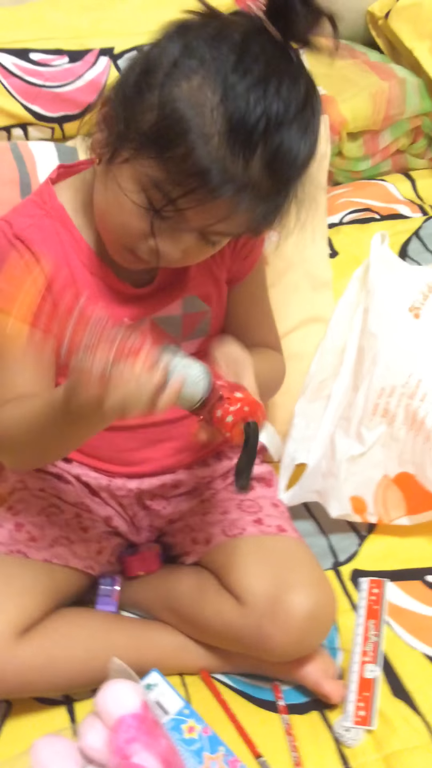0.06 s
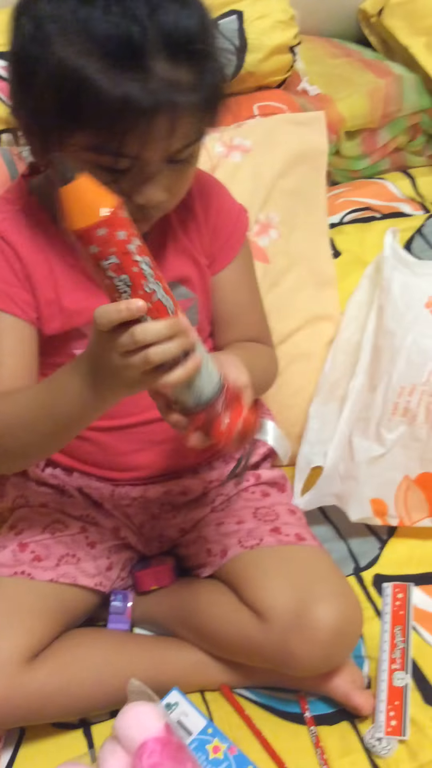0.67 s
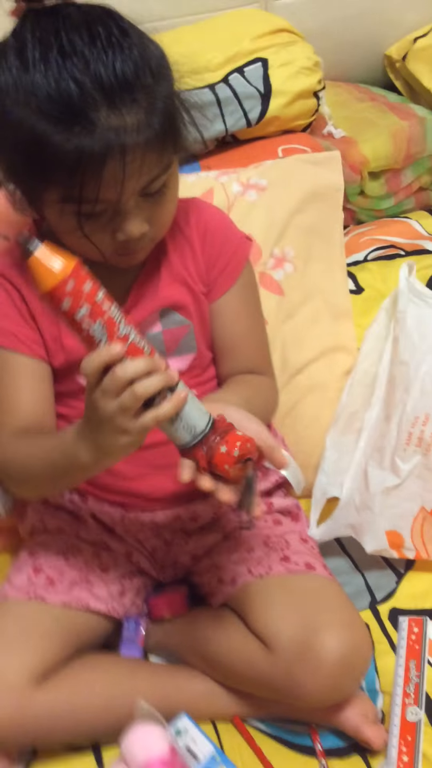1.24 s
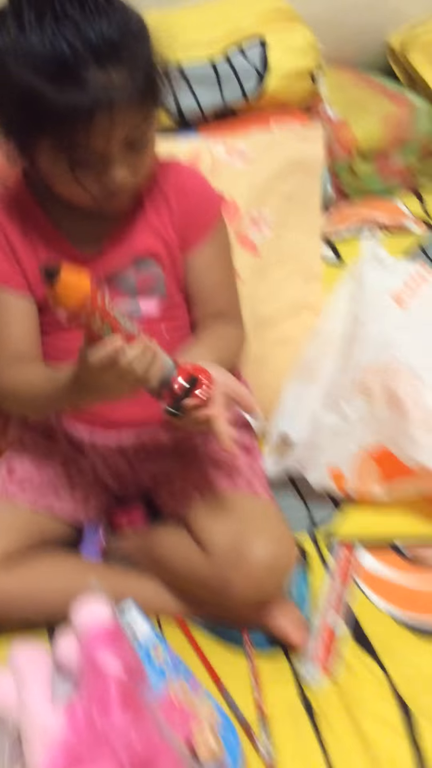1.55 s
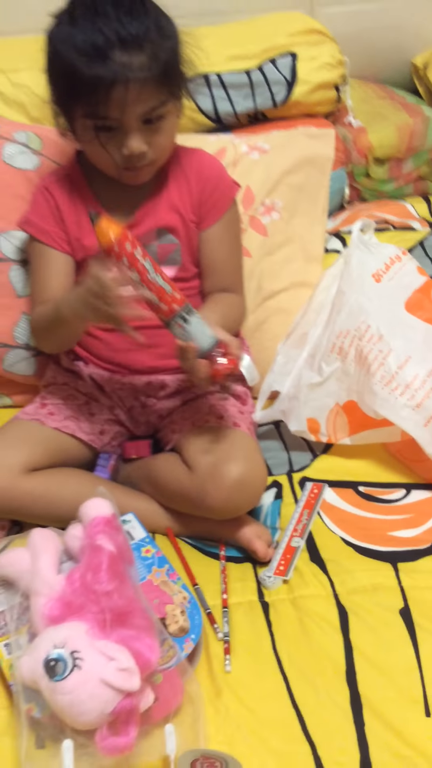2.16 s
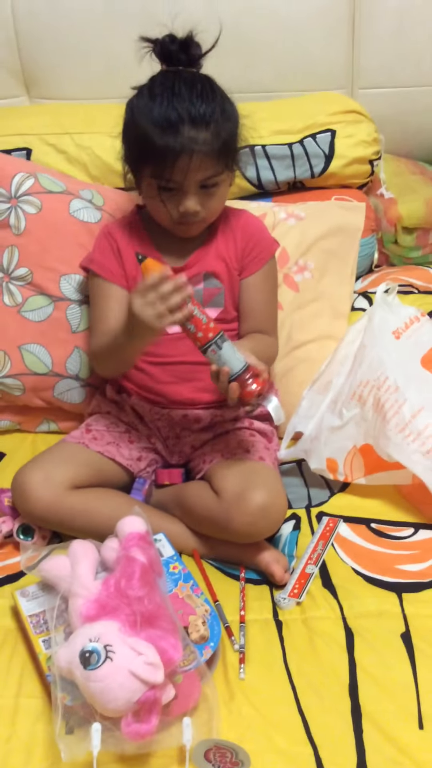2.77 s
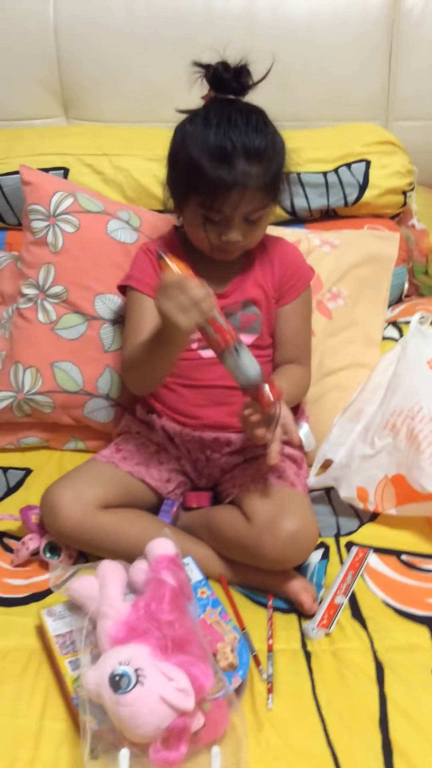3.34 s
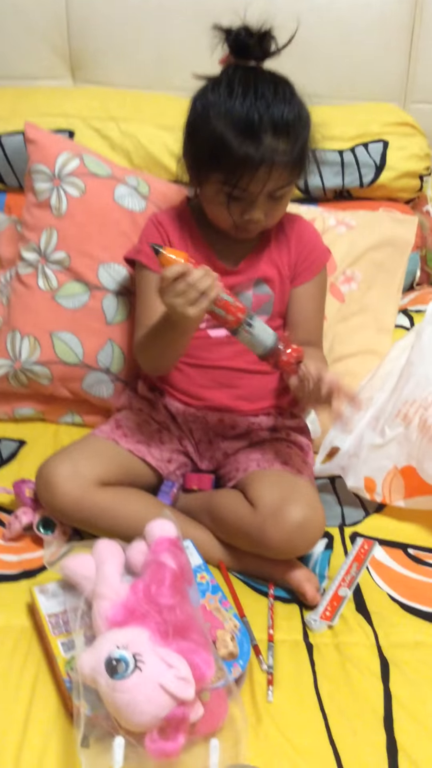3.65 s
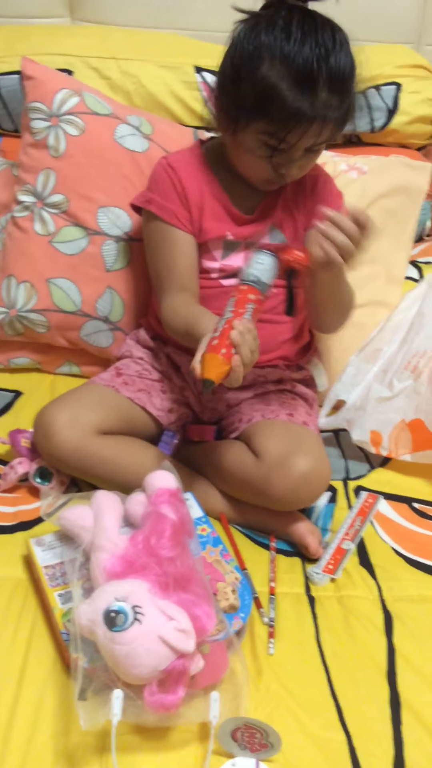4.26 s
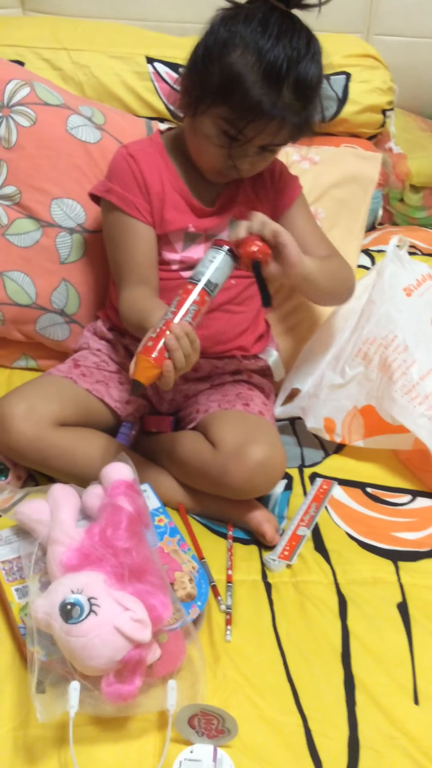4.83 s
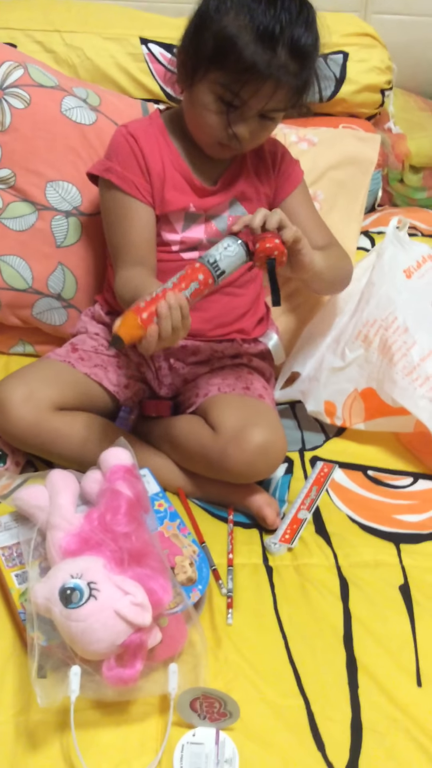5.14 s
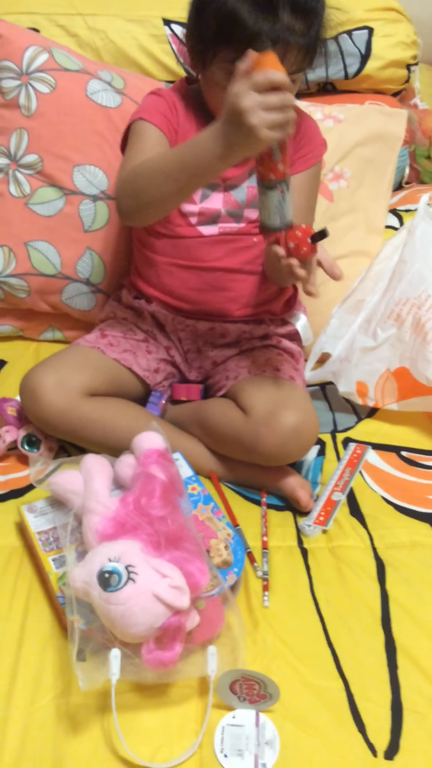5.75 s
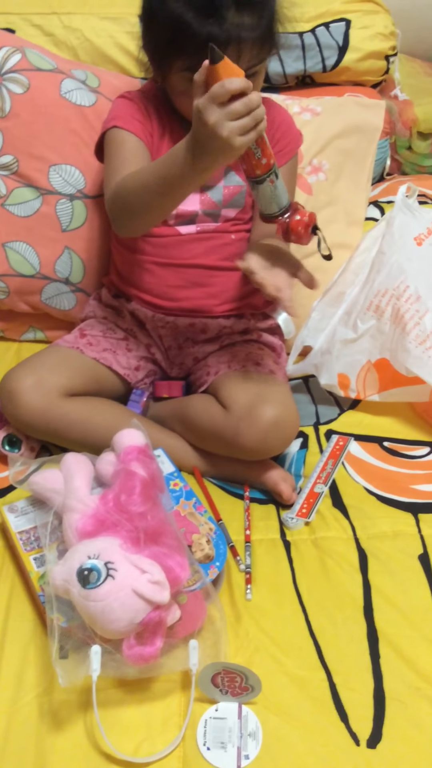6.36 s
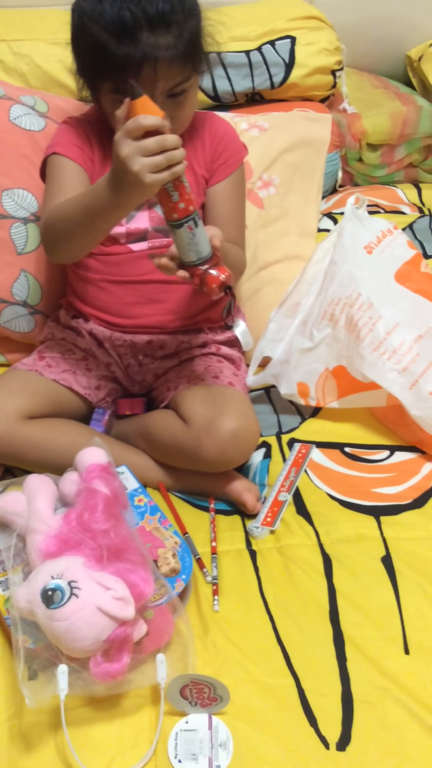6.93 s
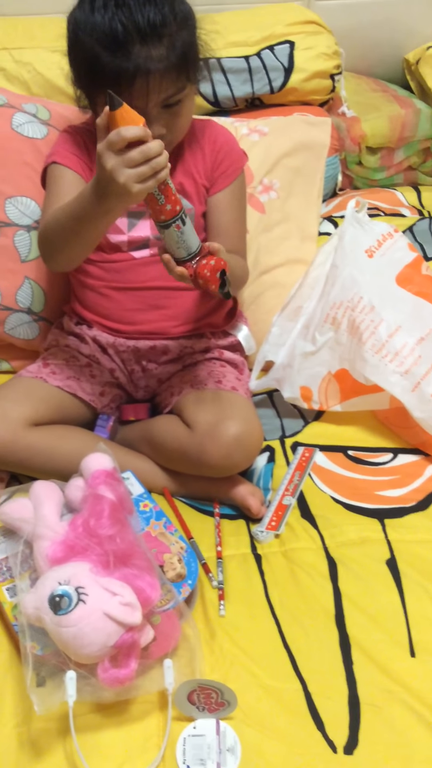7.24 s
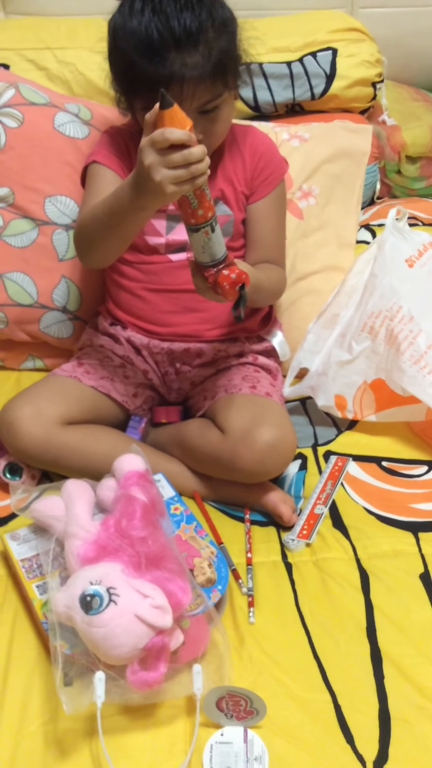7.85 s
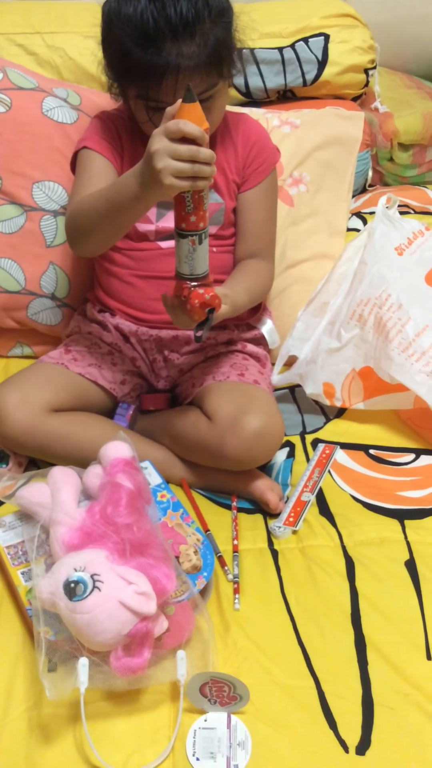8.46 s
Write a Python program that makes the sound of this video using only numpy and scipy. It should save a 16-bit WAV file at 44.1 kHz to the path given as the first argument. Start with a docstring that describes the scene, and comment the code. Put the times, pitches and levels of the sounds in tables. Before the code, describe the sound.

A hard plastic pencil case is handled close by in a small bedroom with a faint, steady hum. A loud, sharp snap comes right at the start. Light clicks and short, faint scrapes follow as the tube's sections twist, with a sharper click near 0.8 seconds. At about 2.4 seconds the cap comes off with a hollow pop, and another click follows at 2.9. From 3 to 4 seconds the plastic rubs more strongly, with clicks, small hollow knocks and a soft rustle of clothes. A bright click sounds near 4.8 seconds, then only faint ticks and rubbing. At about 7.1 seconds there is a quick cluster of sharp snaps. From 7.2 to 8.2 seconds the hand-held microphone takes soft, low bumps and rumbles, with a few last faint ticks until about 8.6 seconds.

```python
"""Handling a plastic pencil case

A hard hollow tube with a cap is turned over in the hands in a small bedroom. Loose parts click and
snap, ringing the shell; the sections rub by stick-slip as they twist; the cap comes off with a hollow
pop of the air inside. Cloth rustles, the room hums, the hand-held microphone takes soft bumps."""
import sys
import numpy as np
from scipy import signal
from scipy.fft import rfft, irfft, next_fast_len
from scipy.io import wavfile
from scipy.ndimage import map_coordinates

SR = 44100
rng = np.random.default_rng(int(sys.argv[2]) if len(sys.argv) > 2 else 0)


def persist_wave(psi):
    """Save psi, clipped to +-1, as 16-bit WAV."""
    counts = np.round(np.clip(psi, -1, 1) * 32767).astype(np.int16)
    wavfile.write(sys.argv[1], SR, np.atleast_2d(counts).T)


N = 379260

# Twists of the sections. Each row: start and end in seconds, relative level in dB, then offsets in dB
# for tube ring, squeak and hollow air.
STROKES = [(0.317, .62, -66.5, -13, 1.5, -6), (0.629, 0.817, -73.5, -8, 3, 6),
           (0.851, 1.02, -67.5, -13, -10, 9), (1.037, 1.214, -66.5, -26, 3, -18),
           (1.471, 1.628, -63.5, -16, -11, -15), (1.651, 1.801, -67.5, -13, -20, -3),
           (1.803, 2.25, -72.5, -4, -20, -10.5), (2.549, 2.716, -64, -9, -16, -5),
           (3.06, 3.443, -58.5, -5, -9.5, -2.5), (3.237, 3.313, -46, -8.5, -30, -15),
           (3.429, 3.64, -55.5, -17, -8, -11.5), (3.504, 3.549, -49, 3, -20, -10.5),
           (3.726, 3.94, -59, -15, -2.5, -18), (4.89, 5.159, -68, -5.5, -7, -3),
           (5.271, 5.329, -65, -5, -5, -9), (5.451, 5.553, -65, -4.5, -15, -1),
           (5.602, 5.707, -63.5, -12, -3, -6), (5.75, 5.916, -64, -7.5, -10, 1),
           (6.56, 6.875, -74, -12.5, -3.5, -5), (6.972, 7.098, -70.5, -12, -20, -2),
           (7.842, 7.924, -71, 1, -19.5, -6), (8.27, 8.508, -72.5, -0.5, -11, -11)]


def amp(db):
    """Decibels to gain."""
    return 10 ** (np.asarray(db) / 20)


def unit(x):
    """Scale to rms 1."""
    return x / np.sqrt(np.mean(x ** 2) + 1e-20)


def along(points, hz):
    """Interpolate (Hz, value) points on a log axis."""
    point_hz, values = np.transpose(points)
    return np.interp(np.log(hz + 1), np.log(point_hz + 1), values)


def add(track, start_s, x):
    """Mix x into the track."""
    i = max(round(start_s * SR), 0)
    track[i:i + len(x)] += x[:max(len(track) - i, 0)]


def filtered(x, response):
    """Apply a response given as a function of Hz."""
    size = next_fast_len(len(x) + SR // 8)
    return irfft(rfft(x, size) * response(np.fft.rfftfreq(size, 1 / SR)), size)[:len(x)]


def coloured(x, spectrum):
    """Shape x by (Hz, dB) points; rms 1."""
    return unit(filtered(x, lambda hz: amp(along(spectrum, hz))))


def resonances(modes, hz):
    """Causal response of (centre Hz, width Hz, dB) modes of alternating sign."""
    return sum((-1) ** k * amp(db) * 1j * hz * width / (centre ** 2 - hz ** 2 + 1j * hz * width)
               for k, (centre, width, db) in enumerate(modes))


def rung(force, modes):
    """Modes driven by a force; rms 1."""
    return unit(filtered(force, lambda hz: resonances(modes, hz)))


def minimum_phase(gain):
    """Most compact impulse response with this gain per frequency."""
    cepstrum = irfft(np.log(np.maximum(gain, 1e-6)))
    half = len(cepstrum) // 2
    cepstrum[1:half] *= 2
    cepstrum[half + 1:] = 0
    return irfft(np.exp(rfft(cepstrum)))


def wobble(knots_per_s):
    """Smooth random curve."""
    knots = rng.standard_normal(int(N * knots_per_s / SR) + 4)
    return map_coordinates(knots, [np.arange(N) * knots_per_s / SR])


def slips(size, per_s, spread_db, hiss):
    """Stick-slip friction: tiny uneven jerks on a smooth hiss."""
    slipping = rng.random(size) < per_s / SR
    strength = amp(spread_db * np.minimum(rng.exponential(size=size), 3))
    jerks = slipping * strength * rng.choice([-1, 1], size)
    return unit(unit(jerks) + hiss * rng.standard_normal(size))


def room(x, tail_db, build_s=0.0049):
    """Reflections of x: a few near surfaces and a diffuse tail."""
    # Room decay. Each row: frequency in Hz, T60 in seconds.
    decay = [(300, 0.14), (1200, 0.21), (4000, .24), (9000, 0.27), (15000, 0.055)]
    # Near surfaces. Each row: delay in seconds, gain in dB.
    echoes = [(.0066, -16.5), (.0075, -14), (0.012, -13.5), (0.0151, -18.5), (.025, -18.5), (0.0411, -24.5)]
    hz, t, noise = signal.stft(rng.standard_normal(SR // 2), SR, nperseg=256)
    tail = signal.istft(noise * amp(-60 * t / along(decay, hz)[:, None]), SR, nperseg=256)[1]
    tail *= 1 - np.exp(-(np.arange(len(tail)) / SR / build_s) ** 2)
    tail *= amp(tail_db) / np.linalg.norm(tail)
    for delay_s, db in echoes:
        stretch = 1 + .04 * rng.uniform(-1, 1)  # paths change as the case moves
        tail[round(delay_s * SR * stretch)] += amp(db)
    return signal.fftconvolve(x, tail)


def room_hum():
    """Steady room noise with a ventilation drone."""
    # Room noise spectrum. Each row: frequency in Hz, relative density in dB.
    spectrum = [(20, -28.5), (50, -7), (100, -3), (175, -2), (256, -2.5), (363, -7), (620, -12.5),
                (1020, -16), (1400, -20.5), (2760, -27), (3720, -27), (5500, -33.5), (9070, -28),
                (15000, -40.5)]
    air = coloured(rng.standard_normal(N), spectrum)
    vent_modes = [(80, 30, -10), (158.3, 23, 3), (356, 60, -8)]
    drone = unit(filtered(rng.standard_normal(N), lambda hz: resonances(vent_modes, hz) ** 2))
    return amp(-65) * air + amp(-71.5) * drone


def cloth():
    """Clothes shift on the bedding: dense, soft friction."""
    # Cloth rustle swelling and fading throughout. Each row: time in seconds, relative level in dB.
    rustle_level = [
        [(0.2, -69), (1.06, -66.5), (1.21, -70.5), (2.9, -73.5), (3.39, -60.5), (3.73, -65.5), (3.92, -71),
         (4.05, -74)],
        [(5.2, -84), (5.36, -81), (5.75, -70.5), (5.96, -84), (6.28, -83.5), (7.24, -78), (8.18, -88),
         (8.6, -79.5)],
    ]
    # Rustle spectrum. Each row: frequency in Hz, relative density in dB.
    spectrum = [(200, -22), (600, 1.5), (1500, 3.5), (3500, 2), (6500, -3.5), (9000, -1.5), (12500, -10.5),
                (15500, -22)]
    level_db = 1.5 + np.interp(np.arange(N) / SR, *np.vstack(rustle_level).T) + wobble(8.3)
    return amp(level_db) * coloured(slips(N, per_s=4000, spread_db=2, hiss=2.1), spectrum)


def grip_rumble(gain_db=-2.5, swing=1.5):
    """The carrying hand rumbles in the microphone as it moves."""
    # Hand motion. Each row: time in seconds, relative level in dB.
    motion = [(0.0, -72), (1.87, -64.5), (2.27, -73), (5.51, -76), (5.8, -69), (5.99, -72), (6.99, -69),
              (7.35, -63.5), (8.14, -62), (8.26, -68), (8.6, -68.5)]
    spectrum = [(15, -21), (35, -6), (60, 2), (110, -2.5), (180, -10), (320, -23), (900, -54.5)]
    motion_db = np.interp(np.arange(N) / SR, *np.transpose(motion))
    mean_db = motion_db.mean()
    level_db = gain_db + mean_db + swing * (motion_db - mean_db) + 2 * wobble(12)
    return amp(level_db) * coloured(rng.standard_normal(N), spectrum)


def bumps(gain_db=-1, rise_s=0.0082, body_hz=81.3, detune=0.09):
    """A shifting grip pushes the microphone's body through a cycle or two."""
    # Soft bumps. Each row: start in seconds, relative peak in dB.
    pushes = [(.681, -50.5), (3.825, -47), (3.87, -46.5), (3.904, -45.5), (4.281, -53.5), (5.805, -52.5),
              (6.975, -50.5), (7.251, -36), (7.369, -47.5), (7.495, -39), (7.527, -40.5), (7.678, -41.5),
              (7.8, -47), (8.05, -43), (8.11, -33), (8.14, -43), (8.193, -41.5)]
    shudder_spectrum = [(20, -19), (45, 11.5), (110, -2), (200, -0.5), (400, -55), (1200, -75)]
    out, t = np.zeros(N), np.arange(SR // 6) / SR
    push = (t / rise_s) ** 2 * np.exp(2 - 2 * t / rise_s)
    for start_s, db in pushes:
        hz = body_hz * (1 + detune * rng.normal())
        thump = push * np.sin(2 * np.pi * hz * t)
        shudder = np.sqrt(push) * coloured(rng.standard_normal(len(t)), shudder_spectrum)
        add(out, start_s, amp(db + gain_db) * (thump + amp(-9) * shudder))
    return out


def pops(t60_cycles=24, attack_s=0.0015):
    """The tube's air rings as a part snaps, a hand knocks or the cap leaves or seats."""
    # Air pops. Each row: start in seconds, level in dB, pitch in Hz.
    strikes = [(.0226, -38.5, 710), (.324, -49.5, 333), (.683, -47.5, 291), (2.4301, -28.5, 359),
               (3.256, -42.5, 390), (3.284, -43.5, 380)]
    puff_spectrum = [(80, -20), (300, -8), (900, -2.5), (2000, -16.5), (6000, -18.5)]
    out, t = np.zeros(N), np.arange(SR // 4) / SR
    for start_s, db, hz in strikes:
        fade = amp(db - 60 * t * hz / t60_cycles)
        note = fade * (1 - np.exp(-t / attack_s)) * np.sin(2 * np.pi * hz * t)
        puff = amp(-16.5) * fade * coloured(rng.standard_normal(len(t)), puff_spectrum)
        add(out, start_s, note + puff)
        add(out, start_s, amp(-5) * room(note + puff, tail_db=-1))
        add(out, start_s + 0.024, amp(-8) * note)  # two walls send the note back
        add(out, start_s + 0.069, amp(-13.5) * note)
    return out


def rubbing(catch_db=3):
    """Twisting sections: friction wakes the wall, the tube's length, its air and a thin squeak."""
    # Wall resonances. Each row: centre in Hz, width in Hz, gain in dB.
    wall_modes = [(1480, 130, -6.5), (1860, 150, 6.5), (2405, 800, -1), (3150, 290, 7), (3550, 390, 3.5),
                  (4220, 260, 3.5)]
    # Spectra of the broad scrape and the treble fizz. Each row: frequency in Hz, relative density in dB.
    scrape_spectrum = [(150, -22), (400, -9), (800, -1), (1500, -5), (3500, -11.5), (5500, -24),
                       (8000, -15.5), (16000, -38)]
    fizz_spectrum = [(2500, -28.5), (4500, -4.5), (5600, 1), (6800, -7.5), (8200, 0.5), (9800, -3),
                     (12500, -25), (14200, -10.5), (15500, -25)]
    tube_modes = [(1125, 62, -1.8), (1250, 63, -0.23)]
    air_modes = [(160, 43, -7), (295, 55, 0.5), (389, 69, 0)]
    squeak_modes = [(11020, 160, 1.5), (14500, 260, -15.5)]
    out = np.zeros(N)
    catching = amp(catch_db * wobble(90))  # surfaces catch and let go within a stroke
    for start_s, end_s, db, tube_db, squeak_db, air_db in STROKES:
        size = max(round((end_s - start_s) * SR), 512)
        creak = slips(size, per_s=170, spread_db=4, hiss=0.22)
        slide = slips(size, per_s=1800, spread_db=3.5, hiss=0.84)
        fizz = slips(size, per_s=1200, spread_db=0.5, hiss=0.39)
        sound = (amp(-3) * rung(creak, wall_modes)
                 + amp(-7) * coloured(slide + creak, scrape_spectrum)
                 + amp(tube_db - 2) * rung(slide, tube_modes)
                 + amp(air_db - 1) * rung(slide, air_modes)
                 + amp(-6) * coloured(fizz, fizz_spectrum)
                 + amp(squeak_db - 1) * rung(slide + creak, squeak_modes))
        pressure = np.sin(np.pi * np.arange(size) / size) ** 0.8
        add(out, start_s, amp(db) * pressure * sound)
    out *= catching
    return amp(-0.5) * out + amp(-5.5) * room(out, tail_db=-1.5)[:N]


def ticks(per_s=14, spread_db=3.5, low_hz=1910, high_hz=4000, middle_db=4, treble_db=-6):
    """Contact rows for clicks(): rubbing surfaces catch faintly, strongest at mid-stroke."""
    rows = []
    for start_s, end_s, stroke_db, *_ in STROKES:
        count = max(round(per_s * (end_s - start_s)), 1)
        for k, (jitter, force, part) in enumerate(rng.random((24, 3))[:count]):
            progress = (k + jitter) / count
            pressure_db = 10 * np.log10(np.sin(np.pi * progress))
            db = min(stroke_db + 4, -59) + pressure_db + spread_db * (2 * force - 1)
            ring_hz = low_hz * (high_hz / low_hz) ** part
            rows.append((start_s + (end_s - start_s) * progress, db, ring_hz, middle_db, treble_db))
    return rows


def contact_gain(hz, force_db, middle_db, treble_db):
    """Spectrum of a blow: a light touch thuds, a hard snap is thinner."""
    low_db = -6.5 - 0.24 * force_db
    spectrum = [(80, low_db - 17), (350, low_db), (700, low_db),
                (1100, (low_db + middle_db) / 2 - 1.5), (1900, middle_db), (3700, -0.37),
                (5400, treble_db / 2), (8500, treble_db + 1.5),
                (11500, treble_db - 1), (15500, treble_db - 9)]
    return amp(along(spectrum, hz))


def blow(t, force_db):
    """An impulse, then chatter that gets shorter and weaker the harder the contact."""
    chatter_s = 0.00325 * 0.5 ** (force_db / 90)
    chatter = rng.standard_normal(len(t)) * np.exp(-(t / chatter_s) ** 2)
    force = chatter / np.linalg.norm(chatter) * chatter_s / 0.0025  # equals the impulse at 2.5 ms
    force[0] += 1
    return force


def clicks(gain_db=23, touch_db=-50, detune=0.016, vary_db=2, ring_width_ratio=0.16):
    """Each blow rings the shell and, most of all, the struck part; hard snaps ring more evenly."""
    # Clicks and snaps. Each row: start in seconds, relative level in dB, struck part's ring in Hz,
    # middle and treble in dB against the 4 kHz band.
    contacts = [(0.0227, -17.5, 5450, -11, -2.5), (0.0246, -33, 4465, -13.5, -7),
                (0.3236, -54, 1560, 3, -7), (0.373, -54.5, 1310, 20, 12), (0.3995, -42, 1480, 9.5, -10),
                (0.4939, -48, 3760, 7, -9), (.5159, -57, 2450, 12, 0), (.5371, -51, 2280, 11, 1),
                (.558, -49, 2320, 8, -2), (.6821, -56.5, 1300, 11, -9), (.789, -55, 1420, 4, 3),
                (.822, -52, 3450, 6, -4), (.844, -30, 3920, -6.5, 1), (1.0563, -47.5, 1480, 8, -12),
                (1.0783, -48, 3040, 1, -9), (1.1235, -47, 2440, 2, -12), (1.1322, -47, 2430, 3, -9),
                (1.1466, -47, 2570, 0, -9), (1.1654, -54.5, 3010, -7, -5), (1.4427, -53, 2290, 6, -11),
                (1.4638, -53.5, 3230, 2, -29), (1.477, -56, 2170, 7, 0), (1.684, -51.5, 3260, -4, -10),
                (1.7346, -53.5, 3350, -3, -11), (2.1261, -55, 1350, 1, -1), (2.4412, -44.5, 8900, -1, 0),
                (2.4737, -47, 9000, -3.5, -6), (2.6564, -57.5, 2300, 15, 1), (2.8621, -34, 2580, 3, -9),
                (3.107, -45.5, 1910, 13, 1), (3.255, -34.5, 3820, 1, -6.5), (3.5698, -41, 9250, 1, 0),
                (3.6297, -50.5, 1940, 19, 11), (3.7626, -39, 3240, 9.5, 4),
                (4.0753, -50.5, 3160, 0.5, -8.5), (4.2115, -50.5, 7710, 2, 1),
                (4.7596, -34, 7900, 1.5, -0.5), (4.7895, -41.5, 4870, 5, -2), (4.913, -55.5, 3230, -4, -12),
                (5.1078, -56, 3700, -9.5, -15), (5.2512, -61.5, 3680, -3.5, -9), (5.2839, -56, 3280, 0, -4),
                (5.6217, -54, 8900, 13, 4), (6.3554, -64, 2070, 8, -10.5), (6.6913, -63, 8140, 7.5, 3),
                (6.7321, -57, 1720, 13, -13), (6.9784, -57.5, 1980, 5, -10), (7.0918, -27.5, 4200, -2, 1),
                (7.094, -27.5, 5900, -7, -5.5), (7.0973, -40, 3900, -6, -6), (7.134, -38.5, 4000, 1, 1),
                (7.1641, -45, 3900, -1, -11), (7.2727, -53, 3970, -20, -1),
                (7.5507, -55.5, 8500, -15.5, -5), (7.87, -56.5, 1293, 17, 3.5),
                (8.5399, -57.5, 1620, 3, -12)]
    # Plastic shell resonances. Each row: centre in Hz, width in Hz, gain in dB.
    shell_modes = [(673, 190, 2), (1150, 130, 0), (1640, 420, 0), (3046, 300, -1.5), (3840, 500, 6),
                   (5770, 490, 1), (8170, 1800, 3)]
    out, size = np.zeros(N), 4096
    hz, t = np.fft.rfftfreq(size, 1 / SR), np.arange(size) / SR
    for start_s, db, ring_hz, middle_db, treble_db in contacts + ticks():
        force_db = db - touch_db  # relative to a light touch
        # the grip shifts and damps the modes from blow to blow
        modes = [(centre * (1 + detune * rng.normal()), width, mode_db + vary_db * rng.normal())
                 for centre, width, mode_db in shell_modes]
        shell = np.sqrt(1 + sum(abs(resonances([mode], hz)) ** 2 for mode in modes))
        part = abs(resonances([(ring_hz, ring_width_ratio * ring_hz, 11 - 0.07 * force_db)], hz))
        contact = contact_gain(hz, force_db, middle_db, treble_db)
        ring = minimum_phase(np.hypot(shell, part) * contact)
        click = signal.fftconvolve(blow(t, force_db), ring)[:size]
        add(out, start_s, amp(db + gain_db) * click / np.linalg.norm(click))
        # the room hears the shell from all sides, so the struck part stands out less
        radiated = minimum_phase(np.hypot(shell, amp(-4) * part) * contact)
        reflections = room(radiated / np.linalg.norm(radiated), tail_db=-1.5, build_s=0.0055)
        room_db = -4 + 0.0437 * force_db
        add(out, start_s, amp(db + gain_db + room_db) * reflections)
    return out


def scene():
    """All sources at one microphone."""
    return (clicks() + rubbing() + pops() + bumps() + grip_rumble() + room_hum() + cloth())[None]


def record(dry):
    """Steep low-pass band limit."""
    top_hz = 15550
    return np.array([filtered(x, lambda hz: 1 / (1 + (hz / top_hz) ** 160)) for x in dry])


dry = scene()
out = record(dry)
persist_wave(out)
```